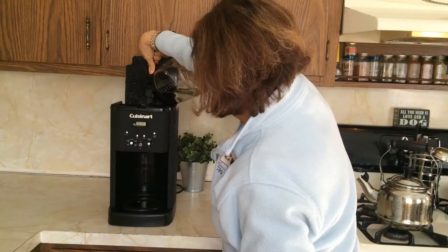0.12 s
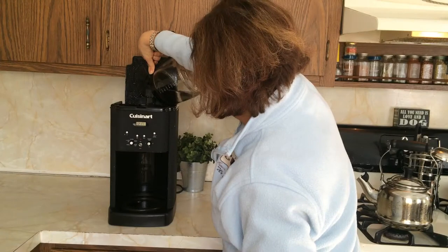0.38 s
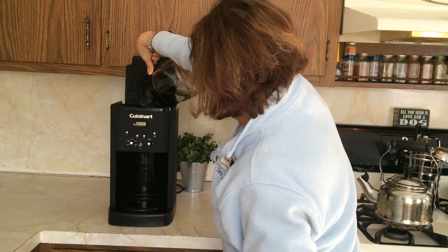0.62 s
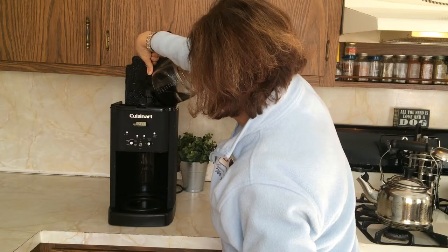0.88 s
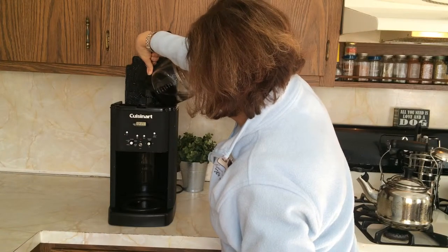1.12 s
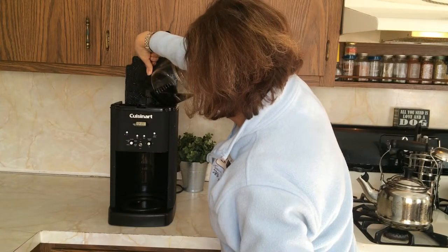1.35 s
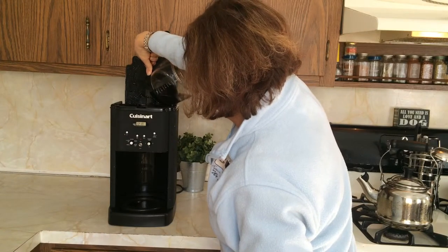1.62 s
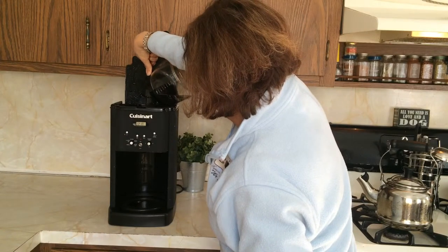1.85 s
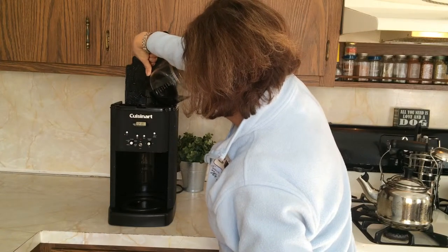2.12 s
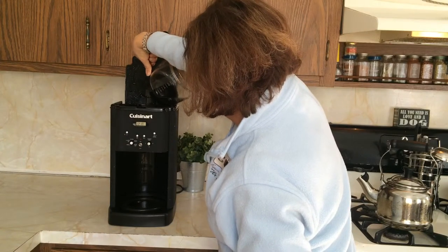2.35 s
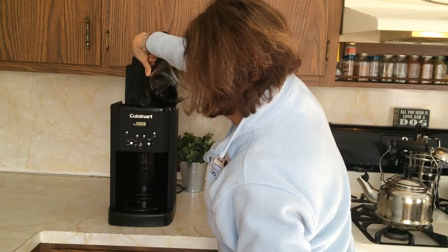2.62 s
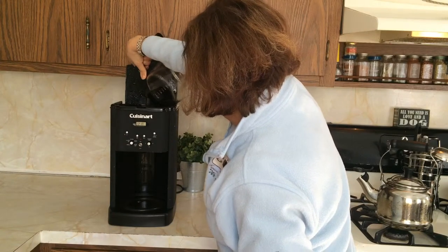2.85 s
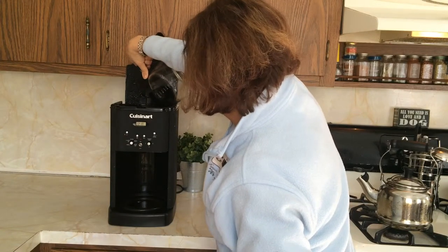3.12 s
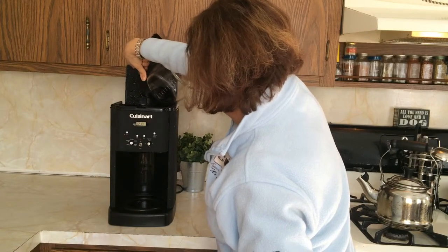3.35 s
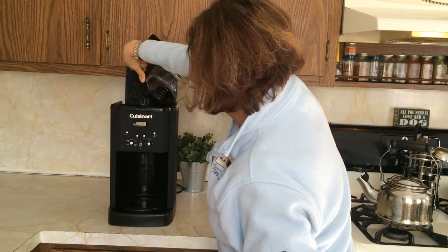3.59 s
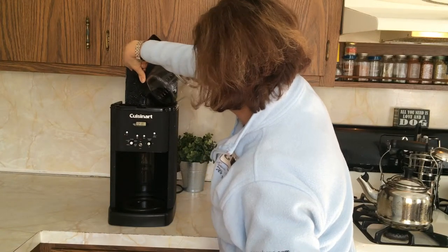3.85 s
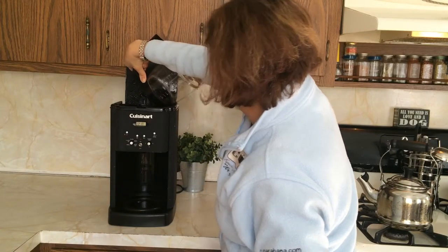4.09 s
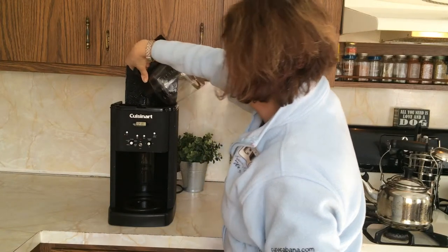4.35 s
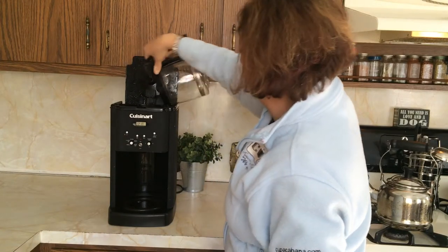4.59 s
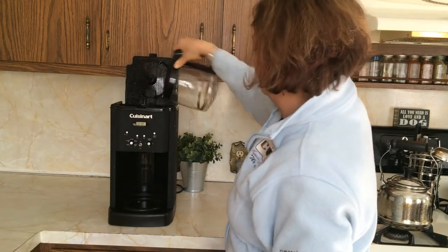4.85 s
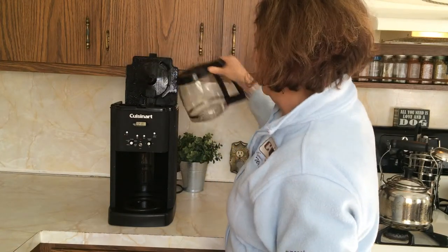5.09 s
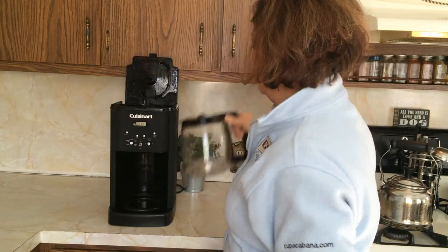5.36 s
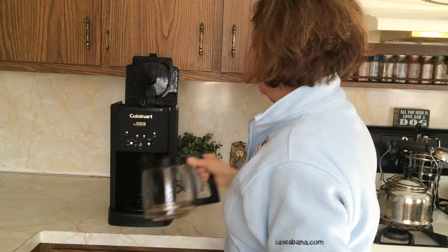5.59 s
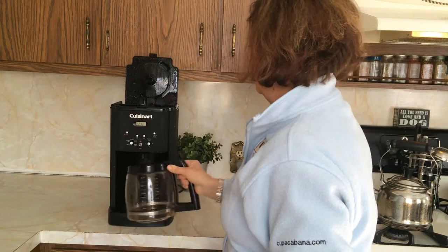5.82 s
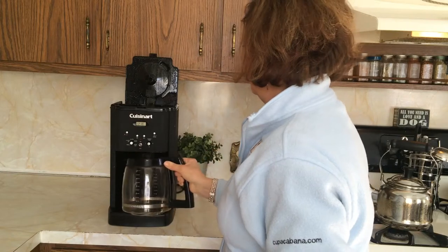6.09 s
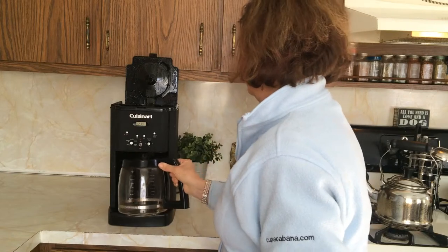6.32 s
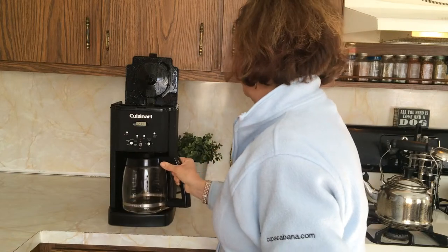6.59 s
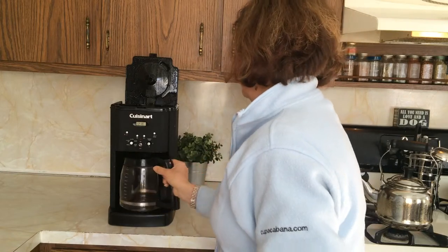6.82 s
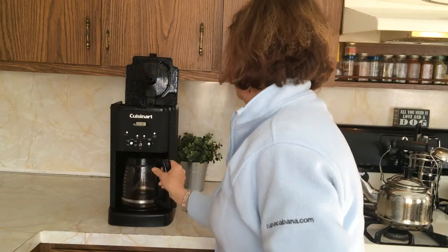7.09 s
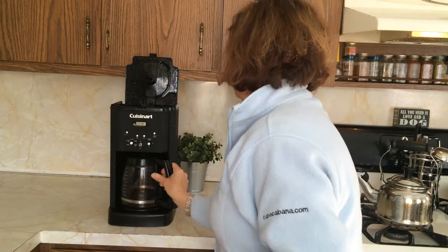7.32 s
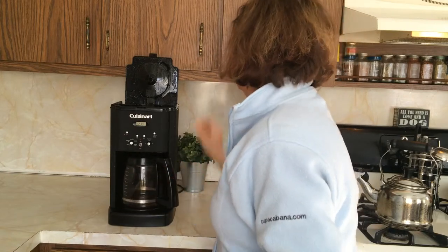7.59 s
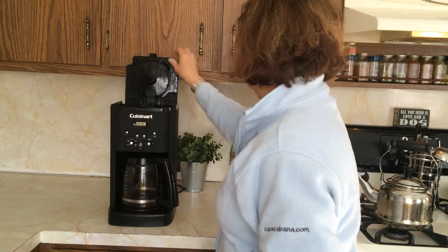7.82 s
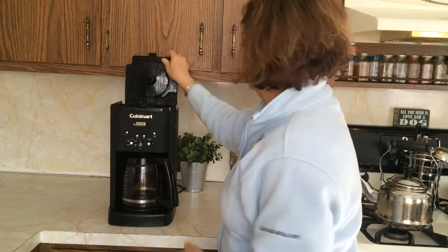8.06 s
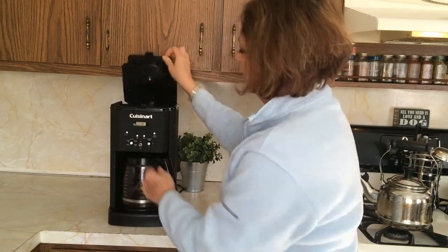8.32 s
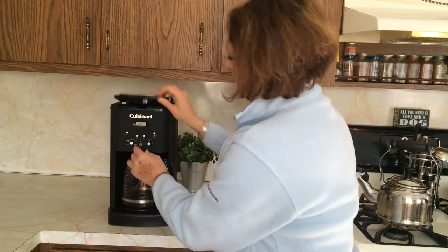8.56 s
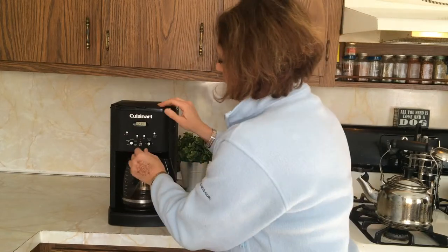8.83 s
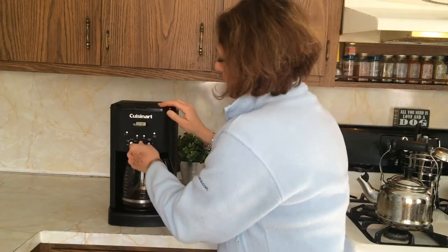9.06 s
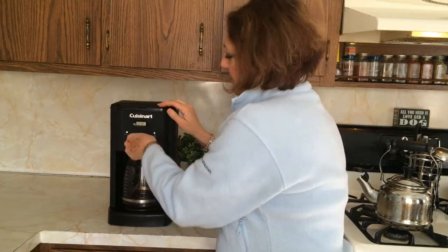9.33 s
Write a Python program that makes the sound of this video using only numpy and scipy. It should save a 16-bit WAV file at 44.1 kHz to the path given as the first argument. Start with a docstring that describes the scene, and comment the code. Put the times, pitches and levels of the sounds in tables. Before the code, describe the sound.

Close in a quiet, hard-walled kitchen, a thin stream of water splashes and gurgles into a hollow plastic tank, thinning to drips. The glass carafe bumps the rim, then lands on its plate with sharp clinking clunks, scrapes and a firm clack. Light handling follows, and a plastic lid folds shut with softer hollow knocks. Short room echo, faint low room tone.

```python
"""Filling a coffee maker

Water trickles from a glass carafe into a plastic tank in a quiet kitchen: noise spray, bubble notes, splashes.
The carafe bumps the rim, is pushed onto its plate, and the lid is folded shut: struck modes and noise scuffs.
A bangle tinkles and a thin ping sounds now and then, as decaying modes; sleeve and hand rustle as noise.
Sparse echoes make the hard walls ring for about a third of a second, over a faint room tone."""
import sys
import numpy as np
from scipy import signal
from scipy.fft import rfft, irfft
from scipy.io import wavfile
from scipy.ndimage import uniform_filter1d

SR = 44100
rng = np.random.default_rng(int(sys.argv[2]) if len(sys.argv) > 2 else 0)


def field_ratio(decibels):
    """Amplitude ratio for a level in dB (20 dB per decade); scalars and array-likes work."""
    return 10 ** (np.asarray(decibels, dtype=float) / 20)


def digitize_waveform(pressure):
    """Quantize a signal to 16-bit integers and store it at the path in sys.argv[1].

    Rows of a 2-D input are taken as channels; values are limited to [-1, 1].
    """
    field = np.atleast_2d(pressure).T
    bounded = np.clip(field, -1, 1)
    quanta = np.round(bounded * 32767).astype(np.int16)
    wavfile.write(sys.argv[1], SR, quanta)


N = 416304

# Thinning stream. Each row: time in seconds, spray level in dB, gurgle level in dB.
STREAM_FLOW = [(0.0, -59, -64.5), (0.15, -65, -70.5), (0.4, -61, -69), (0.54, -65.5, -67),
               (0.95, -66, -69.5), (1.27, -60.5, -111), (1.44, -68.5, -80), (1.87, -69, -71),
               (2.06, -76.5, -72.5), (2.32, -68, -92), (2.7, -79.5, -78), (3.15, -71.5, -70),
               (3.5, -77.5, -88), (3.67, -72, -64), (3.81, -98, -75), (4.55, -84, -84)]
# Spray colour. Each row: frequency in Hz, density in dB per Hz.
SPRAY_SPECTRUM = [(880, -8.5), (1500, -9), (3280, -15), (3870, -10), (5190, -12.5), (6370, -9),
                  (9700, -17.5), (15500, -37)]
# Splashes. Each row: start in seconds, bubble level in dB, bubble pitch in Hz, droplet level in dB.
SPLASHES = [(0.123, -41.5, 895, -57.5), (0.207, -52, 640, -52.5), (0.339, -42, 590, -50.5),
            (0.404, -65, 608, -52.5), (0.511, -39.5, 381, -55), (0.518, -36.5, 835, -70),
            (0.572, -42, 570, -72), (0.765, -49, 640, -53.5), (0.832, -39.5, 845, -53),
            (0.952, -41.5, 1680, -71), (1.064, -38.5, 995, -52.5), (1.108, -43, 940, -57),
            (1.25, -42.5, 940, -54.5), (1.291, -45.5, 870, -50), (1.382, -38, 1150, -62),
            (1.661, -72, 375, -56), (1.776, -37.5, 1640, -71), (1.948, -60, 2000, -60),
            (2.309, -76, 380, -58), (3.16, -42, 930, -56.5), (3.24, -42.5, 2110, -61.5),
            (3.335, -67, 960, -60), (3.476, -46.5, 1180, -72), (3.496, -67, 1420, -57),
            (3.531, -43.5, 1750, -60), (3.59, -45, 1940, -67), (3.647, -34.5, 2180, -55.5),
            (3.718, -42, 427, -58.5), (3.827, -46, 900, -68), (3.884, -41, 2220, -75),
            (3.972, -52, 480, -63), (3.992, -41.5, 1710, -57), (4.384, -44.5, 910, -79),
            (4.455, -49, 935, -85)]
# Short runs of the last trickle. Each row: start in seconds, level in dB, length in seconds.
TRICKLE_RUNS = [(3.155, -64, 0.069), (3.483, -72, 0.24), (3.815, -74, 0.091), (3.982, -67.5, .08),
                (4.153, -69, 0.038), (4.346, -69.5, 0.43)]
# Air above the water. Each row: frequency in Hz, level in dB, t60 in seconds.
TANK_MODES = [(940, 4.5, 0.037), (1400, -3, 0.032), (1840, 1, 0.034), (2300, -21, 0.028)]
# Glass or hand meets plastic. Each row: start in seconds, clack level in dB, hollow housing level in dB,
# favoured housing pitch in Hz, counter thump level in dB, tick level in dB.
KNOCK_BLOWS = [(2.696, -41.5, -34, 640, -51, -37), (2.747, -43.5, -38.5, 690, -54, -49),
               (2.794, -30, -27.5, 620, -36, -41.5), (2.9301, -45, -34, 454, -42, -59),
               (3.0468, -48, -40.5, 530, -37.5, -48.5), (3.8666, -60, -50, 680, -49.5, -87),
               (4.567, -31.5, -25.5, 670, -37, -47.5), (4.607, -45, -33, 427, -47, -73),
               (4.6268, -37, -34.5, 285, -42, -63), (4.7731, -49, -44.5, 710, -45, -86),
               (4.9037, -55.5, -44, 467, -41, -58.5), (4.9459, -34.5, -34.5, 676, -37.5, -56.5),
               (4.9829, -41, -42, 415, -46, -84), (5.9332, -13.5, -26.5, 467, -27.5, -26.5),
               (6.2546, -16.5, -26, 367, -25.5, -27.5), (6.552, -27.5, -38.5, 358, -38, -55),
               (6.6181, -24.5, -49, 370, -31.5, -66), (6.6409, -28, -17.5, 392, -57, -30),
               (6.769, -36, -61, 470, -66, -81), (6.8236, -34.5, -39.5, 362, -37.5, -83),
               (6.9961, -37.5, -46, 403, -56, -68), (7.0131, -29.5, -35, 380, -40, -32.5),
               (7.045, -35, -23, 610, -41.5, -40.5), (7.0825, -48, -28, 543, -62, -55),
               (7.1625, -19, -17, 600, -28.5, -29.5), (7.454, -41.5, -36, 416, -46.5, -66),
               (7.472, -65, -57, 400, -62, -52.5), (7.5107, -58, -37, 390, -40, -54),
               (7.542, -31, -28.5, 580, -33.5, -66), (7.6264, -58, -54, 380, -49.5, -51),
               (7.9206, -36, -44.5, 681, -40.5, -80), (7.9417, -26, -28.5, 840, -28, -78),
               (7.989, -41, -32, 848, -43, -44), (8.1676, -46.5, -51, 550, -59, -56.5),
               (8.2191, -50.5, -51, 630, -43.5, -76), (8.3592, -57, -47.5, 597, -61, -74),
               (8.6363, -48.5, -35.5, 530, -55, -73), (8.6632, -45, -36.5, 593, -48, -56.5),
               (8.6922, -44.5, -28, 446, -62, -57.5), (8.766, -42.5, -37.5, 510, -54, -63),
               (8.7889, -32, -24, 410, -42, -51.5), (9.3385, -58, -40, 390, -46.5, -70),
               (9.3924, -46, -57, 373, -52, -66)]
# Tick of the contact. Each row: frequency in Hz, density in dB per Hz.
TICK_SPECTRUM = [(1800, -46), (3000, -0.5), (4200, -0.5), (6000, -0.5), (9000, -12.5), (15500, -29)]
# Plastic panels. Each row: frequency in Hz, level in dB, t60 in seconds.
PANEL_MODES = [(996.6, 1, 0.06), (1044, 6, 0.058), (1180, 5, 0.047), (1285.5, 5.5, 0.051),
               (1332, 2.5, 0.051), (1481, 9, 0.028), (1609, 6, 0.042), (1724, 4, 0.048), (1870, 1, 0.058),
               (2073, 12, 0.02), (2314, 2, 0.025), (2394, 5, 0.035), (2687, -4.5, 0.034), (2873, -14, .03),
               (3330, -13, 0.066), (3780, 4, 0.013), (4750, -14, 0.017)]
# Hollow body. Each row: frequency in Hz, level in dB, t60 in seconds.
HOUSING_MODES = [(287, -3.5, 0.12), (360.6, 2, 0.079), (404, 6, 0.053), (489, -5.5, 0.19),
                 (551.8, -2.5, 0.074), (602, -3.5, 0.093), (667, 8.5, 0.028), (770, -18, 0.013),
                 (819.7, 1.5, 0.06)]
# Counter. Each row: frequency in Hz, level in dB, t60 in seconds.
COUNTER_MODES = [(32.6, -4, .1), (46.5, 0.5, 0.17), (64.6, -3.5, 0.21), (96.2, -1.5, 0.17), (122, 1, 0.11),
                 (157, -5, 0.11), (196.3, -3.5, 0.22), (250, 4, 0.062)]
# Low bumps of the counter. Each row: start in seconds, level in dB, favoured pitch in Hz.
COUNTER_BUMPS = [(1.2743, -55, 49.7), (2.80, -32.5, 250), (3.068, -53.5, 60), (8.801, -39.5, 254),
                 (4.62, -34, 241), (5.94, -27.5, 203), (7.164, -34.5, 92), (7.99, -36.5, 80),
                 (8.959, -54, 39)]
# Glass, fingers or a slosh slide over plastic. Each row: start in seconds, level in dB, length in seconds,
# hardness in dB an octave.
SCUFF_STROKES = [(2.699, -51.5, 0.054, 7), (2.818, -48, 0.049, 6.5), (4.633, -55, 0.036, -10),
                 (4.846, -57.5, 0.23, -30.5), (5.09, -67.5, 0.028, -1.5), (5.653, -50.5, 0.045, -4),
                 (5.744, -58, 0.059, 0), (6.635, -34, 0.017, 5), (6.985, -48, 0.15, -19.5),
                 (7.109, -50, 0.083, -32), (7.139, -36, 0.015, -5), (7.146, -30.5, 0.02, -16),
                 (7.186, -48, 0.11, -9), (7.394, -56, 0.069, -19.5), (7.494, -55, 0.074, 0.5),
                 (7.897, -60, 0.076, 7), (8.001, -48, 0.057, -20), (8.174, -69, 0.1, 6),
                 (8.322, -61.5, 0.027, -10), (8.714, -63.5, 0.2, 0), (8.994, -57.5, 0.044, 7),
                 (9.199, -56.5, 0.028, 5.5), (9.392, -66, 0.067, 15)]
# Grit of a slide. Each row: frequency in Hz, density in dB per Hz.
SLIDE_SPECTRUM = [(400, -14), (900, -3.5), (1500, -0.5), (2400, -3.5), (3000, -6), (4500, -10), (8000, -20),
                  (15000, -41)]
# The carafe rings. Each row: start in seconds, level in dB, sharpness in dB an octave.
CARAFE_CLINKS = [(5.9334, -27.5, -9), (6.2522, -21.5, -2.5), (6.6184, -33, -3.5), (6.6414, -52, -5),
                 (6.8234, -43.5, -11), (7.0134, -35, -4), (7.1616, -34, -3), (7.6261, -64, -9)]
# Carafe glass. Each row: frequency in Hz, level in dB, t60 in seconds.
GLASS_MODES = [(489.6, 3.5, 0.17), (1670, -25, .15), (2220, 9, 0.076), (3530, -4, .22), (3544, 4, 0.28),
               (4170, 6, 0.25), (4700, 4, 0.1), (5930, -3, .25), (7400, -3, 0.28), (8900, -16.5, .2),
               (11200, -10, .2)]
# The bangle is jogged. Each row: start in seconds, level in dB.
BANGLE_TINKLES = [(0.2274, -53), (2.3096, -55), (3.2564, -65), (4.2263, -67), (8.2597, -65), (9.0344, -51)]
# Bangle. Each row: frequency in Hz, level in dB, t60 in seconds.
BANGLE_MODES = [(6500, 6, 0.17), (10300, -6, .15), (9860, 5, 0.43), (10160, 0, 0.16), (13800, -11, .15),
                (13400, -8, 0.22)]
# Thin faint pings. Each row: start in seconds, level in dB.
FAINT_PINGS = [(0.5516, -55), (5.1157, -60)]
# Ping. Each row: frequency in Hz, level in dB, t60 in seconds.
PING_MODES = [(3790, -8, 0.25), (3750, -6, 0.16)]
# Sleeve and hand brushing plastic. Each row: time in seconds, level in dB.
RUSTLE_LEVEL = [(4.6, -64), (5.17, -79.5), (5.8, -74.5), (6.42, -68), (7.04, -61), (7.7, -72.5),
                (8.54, -69), (9.03, -71.5), (9.44, -64.5)]
# Rubbed plastic. Each row: frequency in Hz, density in dB per Hz.
RUB_SPECTRUM = [(300, -0.5), (700, 3), (1200, -9.5), (2400, -10.5), (3000, -12), (7000, -14.5),
                (15000, -40)]
# Echo decay. Each row: frequency in Hz, t60 in seconds.
KITCHEN_T60 = [(100, 0.86), (260, 0.29), (700, 0.41), (1840, 0.37), (4850, 0.3), (12800, 0.19)]
# Room tone. Each row: frequency in Hz, density in dB per Hz.
HUSH_SPECTRUM = [(12, -59), (20, -14.5), (112, 2.5), (232, -9.5), (282, -13.5), (382, -12), (705, -24),
                 (767, -21), (1040, -23.5), (1580, -21), (1980, -26.5), (6020, -27), (15500, -38.5)]
# Microphone response. Each row: frequency in Hz, gain in dB.
MIC_RESPONSE = [(20, -4), (2400, 0.5), (2900, -0.5), (6000, -4), (10000, -1), (13000, 0), (16000, -2)]

DRONE_DB, DRONE_PIVOT_DB = -13.5, -60  # drone relative to the spray where the spray is at the pivot
DRONE_FOLLOWS = 0.34  # share of the spray's dB swings
DROPLET_HZ, DROPLET_SCATTER_OCTAVES = 5170, 0.3
REBOUND_S, REBOUND_DB = 0.007, -7.5  # each clack lands twice
THUMP_RATIO = 0.29  # favoured counter pitch over favoured housing pitch
ECHO_DB, HUSH_DB = -4.5, -65.5


def evened(x):
    """Scales to rms 1."""
    return x / np.sqrt(np.mean(x ** 2) + 1e-20)


def read(points, hz):
    """Looks a spectrum up on a log-frequency axis."""
    f, value = np.transpose(points)
    return np.interp(np.log(hz + 1), np.log(f + 1), value)


def curve(rows, column=1, gain=1.0, about_db=0.0):
    """Gain over time from a dB column, its swings about about_db scaled by gain; silent outside the table."""
    rows, t = np.array(rows), np.arange(N) / SR
    db = about_db + gain * (np.interp(t, rows[:, 0], rows[:, column]) - about_db)
    return field_ratio(db) * (t >= rows[0, 0]) * (t <= rows[-1, 0])


def add(mix, start_s, sound):
    """Mixes a sound in at start_s."""
    part = mix[round(start_s * SR):][:len(sound)]
    part += sound[:len(part)]


def hiss(points, patchy_db, flicker_db):
    """Coloured noise of rms 1 with drifting time-frequency patches and a flicker shared by all bands."""
    hz = np.fft.rfftfreq(1024, 1 / SR)
    real, imag, patches = rng.standard_normal((N // 256 + 5, 513, 3)).T
    flicker = evened(uniform_filter1d(patches[0], size=3))
    patches = uniform_filter1d(patches, size=9, axis=0)
    patches = evened(uniform_filter1d(patches, size=10, axis=1))
    level_db = read(points, hz)[:, None] + patchy_db * patches + flicker_db * flicker
    z = (real + 1j * imag) * field_ratio(level_db)
    return evened(signal.istft(z, nperseg=1024, noverlap=768)[1][:N])


def tint(x, points, tilt_db=0.0):
    """Colours a burst by a spectrum and a slope an octave that sets in near 1 kHz; rms 1."""
    hz = np.fft.rfftfreq(len(x), 1 / SR)
    gain = field_ratio(read(points, hz) + tilt_db * np.log2(1 + hz / 1000))
    return evened(irfft(rfft(x) * gain, len(x)))


def ring(modes, spread_db, rough_db=0.0, rise_s=0.00036, near_hz=None, off_db=0.0):
    """One blow on a set of modes, peak 1; each mode's strength varies at random from blow to blow."""
    hz, db, t60 = np.transpose(modes)[:, :, None]
    t = np.arange(0, min(t60.max(), 0.5), 1 / SR)
    chance = rng.standard_normal((len(modes), 1))
    if near_hz:  # modes fade by off_db an octave away from the favoured pitch
        db = db - off_db * abs(np.log2(hz / near_hz))
    # loose contact: every mode flutters in its own way
    flutter = np.sin(70 * t * (3 + chance) + 5 * chance)
    flutter = flutter + np.sin(190 * t * (3 - chance) + 9 * chance)
    level = field_ratio(db + spread_db * chance + rough_db * flutter - 60 * t / t60)
    sound = (level * np.sin(2 * np.pi * (hz * t + chance))).sum(0)
    sound = sound * (1 - np.exp(-t / rise_s))
    return sound / abs(sound).max()


def bubble(hz, cycles, climb):
    """A bubble's note dies in a few cycles and climbs as it nears the surface."""
    turns = np.arange(int(4 * cycles * SR / hz)) * hz / SR
    note = np.sin(2 * np.pi * turns * (1 + climb * turns / cycles))
    return note * np.exp(-turns / cycles) * (1 - np.exp(-turns))


def grains(lo_hz, hi_hz, cycles, per_s, spread_db, tilt_db):
    """A crowd of bubbles of 24 sizes, rms 1; a few are much louder."""
    size = field_ratio(spread_db * np.minimum(rng.exponential(1, N), 5)) * (rng.random(N) < per_s / SR)
    kind, out = rng.integers(0, 24, N), np.zeros(N)
    for k, hz in enumerate(np.geomspace(lo_hz, hi_hz, 24)):
        notes = signal.oaconvolve(size * (kind == k), bubble(hz, cycles, 0.073))[:N]
        out += field_ratio(tilt_db * k / 24) * notes
    return evened(out)


def stream():
    """Fine spray where the stream breaks, bubbles gurgling in the tank, and its low drone."""
    spray = hiss(SPRAY_SPECTRUM, 4.9, 3.8) + 0.5 * grains(2310, 20700, 1.75, 3500, 5.2, 0.0)
    gurgle = grains(294.0, 2225, 1.27, 900, 4.1, 7.1)
    drone = grains(125.0, 244, 2.82, 200, 7.4, 0.0)
    drone_level = curve(STREAM_FLOW, column=1, gain=DRONE_FOLLOWS, about_db=DRONE_PIVOT_DB)
    out = curve(STREAM_FLOW, column=1) * spray + curve(STREAM_FLOW, column=2) * gurgle
    return out + field_ratio(DRONE_DB) * drone_level * drone


def splashes():
    """A splash is a bubble note, six fainter bubbles just after it, and a burst of droplet noise."""
    out, t = np.zeros(N), np.arange(SR // 8) / SR
    envelope = np.exp(-t / 0.012) * (1 - np.exp(-t / 0.00062))
    for s, db, hz, droplet_db in SPLASHES:
        add(out, s, field_ratio(db) * bubble(hz, 1.73, 0.024))
        for late, octaves in rng.standard_normal((6, 2)):
            small = bubble(hz * 2 ** (0.706 * octaves), 3.06, 0.016)
            add(out, s + 0.02 * abs(late), field_ratio(db - 12.5) * small)
        top = DROPLET_HZ * 2 ** (DROPLET_SCATTER_OCTAVES * rng.standard_normal())
        spectrum = [(top / 3, -18), (top * 0.7, -6), (top, 0), (top * 1.5, -6), (top * 3, -18)]
        droplets = tint(rng.standard_normal(len(t)), spectrum)
        add(out, s, field_ratio(droplet_db) * droplets * envelope)
    return out


def trickle():
    """Scattered drops, each ringing the air in the tank in one of six slightly different ways."""
    drops = field_ratio(7.9 * np.minimum(rng.exponential(1, N), 2)) * (rng.random(N) < 150 / SR)
    kind, out, runs = rng.integers(0, 6, N), np.zeros(N), np.zeros(N)
    for k in range(6):
        out += signal.oaconvolve(drops * (kind == k), ring(TANK_MODES, 2.7, rough_db=-1.5))[:N]
    t = np.arange(SR // 2) / SR
    for s, db, length_s in TRICKLE_RUNS:  # each run sets in, holds and dies away
        add(runs, s, field_ratio(db) * (1 - np.exp(-t / 0.0099)) * np.exp(-(t / length_s) ** 3))
    return runs * evened(out)


def thump(db, hz, off_db=9, rise_s=0.0046):
    """The slow low answer of the counter, strongest near one pitch."""
    return field_ratio(db) * ring(COUNTER_MODES, 0.96, rise_s=rise_s, near_hz=hz, off_db=off_db)


def knocks():
    """A noise tick, the clack of panels, the hollow housing, and the slower thump of the counter."""
    out, t = np.zeros(N), np.arange(SR // 4) / SR
    chatter = np.exp(-t / 0.006) + 0.08 * np.exp(-t / 0.036)  # parts rattle for some ms after the blow
    for s, clack_db, hollow_db, hollow_hz, thump_db, tick_db in KNOCK_BLOWS:
        noise = rng.standard_normal(len(t))
        add(out, s, field_ratio(tick_db) * tint(noise, TICK_SPECTRUM) * chatter)
        add(out, s, field_ratio(clack_db - 18.0) * tint(noise, RUB_SPECTRUM, -1.1) * chatter)
        for late_s, db in (0, clack_db), (REBOUND_S, clack_db + REBOUND_DB):
            add(out, s + late_s, field_ratio(db) * ring(PANEL_MODES, 0.99, rough_db=9.0, rise_s=0.00058))
        hollow = ring(HOUSING_MODES, 2.0, rough_db=2.5, rise_s=0.0017, near_hz=hollow_hz, off_db=16.5)
        add(out, s, field_ratio(hollow_db) * hollow)
        add(out, s, thump(thump_db, THUMP_RATIO * hollow_hz))
    return out


def bumps():
    """Low bumps of the counter: its modes with a slow rise and a narrow favoured range."""
    out = np.zeros(N)
    for s, db, hz in COUNTER_BUMPS:
        add(out, s, thump(db, hz, off_db=29.5, rise_s=0.012))
    return out


def scuffs():
    """Rough sliding contact: noise that swells quickly and fades over the stroke."""
    out, t = np.zeros(N), np.arange(SR // 2) / SR
    for s, db, length_s, hard_db in SCUFF_STROKES:
        noise, rough = rng.standard_normal((2, len(t)))
        grit = field_ratio(1.57 * evened(uniform_filter1d(rough, size=200)))
        stroke = (1 - np.exp(-t / 0.0066)) * np.exp(-(t / max(length_s, 0.01)) ** 3.2)
        add(out, s, field_ratio(db) * tint(noise, SLIDE_SPECTRUM, hard_db) * grit * stroke)
    return out


def chimes(blows, modes, spread_db, rough_db):
    """Struck long thin modes; a third column makes a blow favour the high or the low ones."""
    out = np.zeros(N)
    for s, db, *sharp_db in blows:
        tilt_db = sum(sharp_db)  # 0 without a third column
        struck = [(hz, mode_db + tilt_db * np.log2(hz / 4000), t60) for hz, mode_db, t60 in modes]
        add(out, s, field_ratio(db) * ring(struck, spread_db, rough_db))
    return out


def rustle():
    """Sleeve and hand brushing plastic: flickering noise under a level curve."""
    return curve(RUSTLE_LEVEL) * hiss(RUB_SPECTRUM, patchy_db=1.1, flicker_db=3)


def kitchen(x):
    """Sparse echoes of random sign, each band dying at its own speed; three tails take turns."""
    out, turn = np.zeros(N), 2 * np.pi * 2.3 * np.arange(N) / SR
    for k in range(3):
        taps = np.zeros(SR // 2)
        at = np.arange(200, len(taps) - 20, 20)
        taps[at + rng.integers(0, 20, len(at))] = rng.choice([-1.0, 1.0], len(at))
        hz, t, z = signal.stft(taps, SR, nperseg=256)
        decay = field_ratio(-60 * t / read(KITCHEN_T60, hz)[:, None])
        tail = signal.istft(z * decay, SR, nperseg=256)[1]
        share = np.sqrt(2 / 3) * np.cos(turn + k * np.pi / 3)
        out += signal.oaconvolve(x * share, tail / np.linalg.norm(tail))[:N]
    return out


def hush():
    """Room tone: steady, mostly low noise."""
    return field_ratio(HUSH_DB) * hiss(HUSH_SPECTRUM, patchy_db=0.46, flicker_db=0.32)


def scene():
    """Everything at the machine is heard directly and off the walls, over the room tone."""
    near = stream() + splashes() + trickle()
    near += knocks() + bumps() + scuffs()
    near += chimes(CARAFE_CLINKS, GLASS_MODES, spread_db=0.48, rough_db=4.9)
    near += chimes(BANGLE_TINKLES, BANGLE_MODES, spread_db=1.2, rough_db=3.1)
    near += chimes(FAINT_PINGS, PING_MODES, spread_db=1.3, rough_db=6.9)
    near += rustle()
    return (near + field_ratio(ECHO_DB) * kitchen(near) + hush())[None]


def band_limit(x):
    """A steep low-pass at the top of the band."""
    return signal.sosfilt(signal.butter(12, 15870, fs=SR, output="sos"), x)


def record(dry):
    """The microphone's uneven response dips by a few dB in the lowest bass and around 6 kHz."""
    hz = np.fft.rfftfreq(N, 1 / SR)
    mix = irfft(rfft(dry) * field_ratio(read(MIC_RESPONSE, hz)), N)
    return band_limit(mix)


dry = scene()
out = record(dry)
digitize_waveform(out)
```